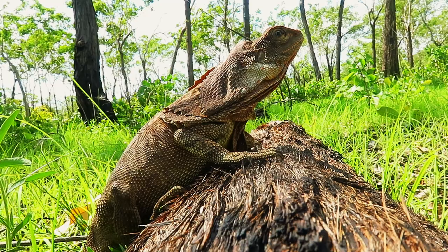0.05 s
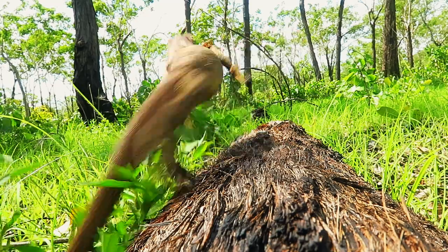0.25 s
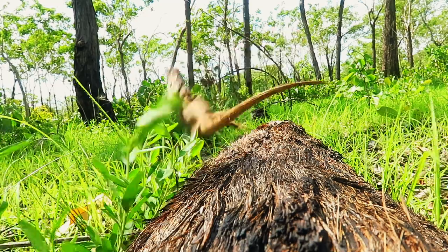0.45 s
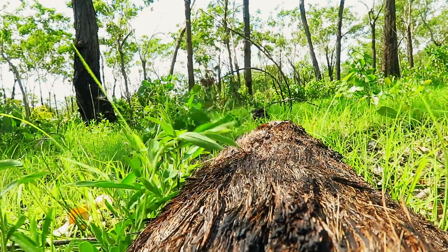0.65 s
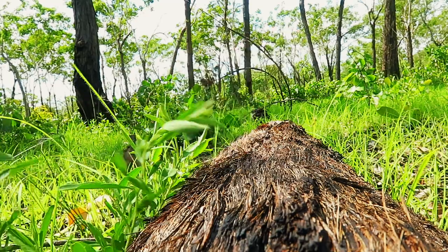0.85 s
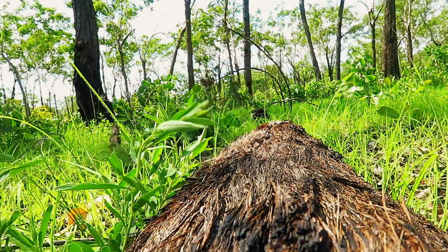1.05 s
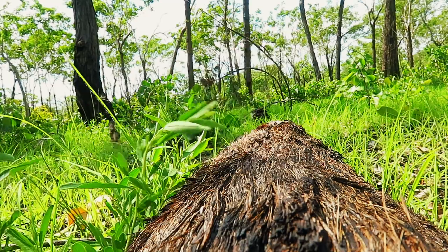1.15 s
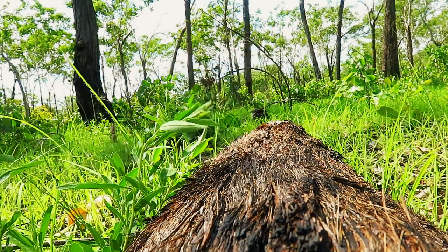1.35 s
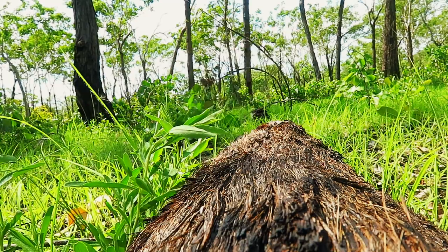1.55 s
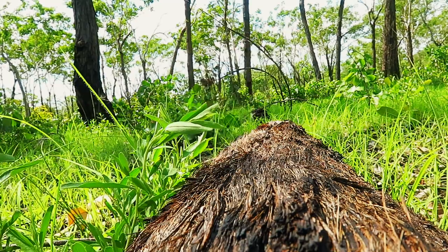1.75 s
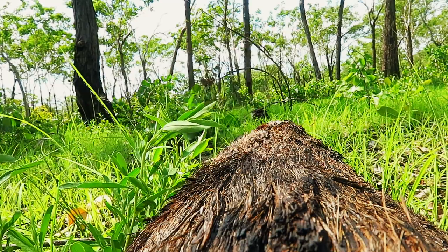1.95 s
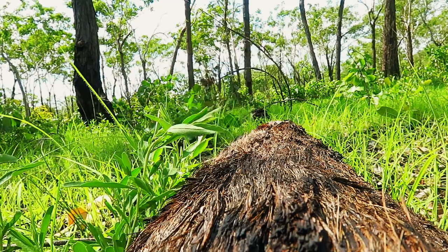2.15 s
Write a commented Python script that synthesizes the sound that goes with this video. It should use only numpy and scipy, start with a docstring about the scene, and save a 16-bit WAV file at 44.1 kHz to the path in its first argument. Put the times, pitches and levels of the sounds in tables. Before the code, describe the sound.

Dry grass and leaves crackle as a lizard dashes off in short, fading bursts.

```python
"""Lizard in dry grass

A lizard scrambles off a log, lands in dry grass and runs away in three dashes, in quiet woodland.
Blades brush its body as a fine crackle, dead leaves crunch, stalks snap and its feet thud softly.
Behind it lie a faint hiss of air and a low hum. Two closely spaced microphone ports listen."""
import sys
import numpy as np
from scipy import signal
from scipy.fft import rfft, irfft
from scipy.io import wavfile

SR = 44100
rng = np.random.default_rng(int(sys.argv[2]) if len(sys.argv) > 2 else 0)


def master(y):
    """Save y as 16-bit WAV."""
    cut = np.clip(np.atleast_2d(y).T, -1, 1)
    pcm = np.round(cut * 32767)  # scale
    wavfile.write(sys.argv[1], SR, pcm.astype(np.int16))


N = 97020  # 2.2 seconds
TIME_S, FREQS_HZ = np.arange(N) / SR, np.fft.rfftfreq(N, 1 / SR)


def amp(db):
    """Turns decibels into a multiplier."""
    return 10 ** (np.asarray(db) / 20)


def unit(x):
    """Scales a sound to an average (rms) level of 1."""
    return x / np.sqrt(np.mean(x ** 2) + 1e-20)


def read(points, hz):
    """Reads between a table's rows, on a log-frequency scale."""
    freqs, values = np.transpose(points)
    return np.interp(np.log(hz + 1), np.log(freqs + 1), values)


def add(mix, start_s, sound):
    """Mixes a sound in at its start time."""
    part = mix[max(round(start_s * SR), 0):][:len(sound)]
    part += sound[:len(part)]


def colour(x, tone, size=4096):
    """Shapes bass and treble to a tone table, with no ringing ahead of a click."""
    log_gain = np.log(amp(read(tone, abs(np.fft.fftfreq(size, 1 / SR)))))
    taps = np.fft.ifft(np.exp(np.conj(signal.hilbert(log_gain)))).real[:size // 2]
    return signal.fftconvolve(x, taps)[:len(x)]


def resonate(x, hz, width_hz):
    """Makes a sound ring around one pitch."""
    r = np.exp(-np.pi * width_hz / SR)
    return signal.lfilter([1 - r, 0, r - 1], [1, -2 * r * np.cos(2 * np.pi * hz / SR), r * r], x)


def clicks(n, per_s, spread_db):
    """Tiny random breaks, a few much louder than the rest."""
    size = amp(spread_db * np.minimum(rng.exponential(1, n), 4))
    return size * rng.choice([-1, 1], n) * (rng.random(n) < per_s / SR)


def drift(rate_hz):
    """A smooth random wobble."""
    return unit(irfft(rfft(rng.standard_normal(N)) * np.exp(-(FREQS_HZ / rate_hz) ** 2), N))


def ports(shared, apart, likeness):
    """Makes left and right: likeness 1 is the same, 0 unrelated, -1 opposite."""
    alike = np.clip(read(likeness, FREQS_HZ), -1, 1)
    mid = rfft(shared) * np.sqrt((1 + alike) / 2)
    side = rfft(apart) * np.sqrt((1 - alike) / 2)
    return irfft(np.array([mid + side, mid - side]), N)


# The air's tone: frequency_hz, level_db
AIR_TONE = [(12, -32), (25, -19), (70, -5), (180, -7.5), (320, -12.5), (800, -16), (1400, -21), (4400, -24),
            (6500, -26), (11500, -34), (13500, -47), (16000, -62)]
# How alike the air is left and right: frequency_hz, likeness
AIR_LIKENESS = [(60, .99), (130, 0.98), (400, 0.68), (1400, 0.26), (3100, 0.36), (15000, -0.61)]

def air():
    """Woodland air hisses faintly."""
    hiss = [unit(colour(rng.standard_normal(N), AIR_TONE)) for _ in range(2)]
    return amp(-51.5) * ports(*hiss, AIR_LIKENESS)


def hum(pitch_hz=57.6, waver=0.44):
    """A low note wavers, with a weaker one an octave up."""
    phase = 2 * np.pi * pitch_hz * TIME_S + waver * drift(5.6)
    low = np.sin(phase) * (1 + waver * drift(5.5))
    octave = amp(-5) * np.sin(2 * phase) * drift(6.8)
    return amp(-58.5) * unit(low + octave)


# How strongly each move brushes the grass: time_s, rustle_db, fizz_db
LEAP = [(0.16, -56, -93), (0.182, -50, -58), (0.214, -31, -48.5), (0.236, -39, -50.5), (0.266, -33, -44),
        (0.392, -41.5, -55), (0.442, -37, -46), (0.45, -47.5, -52.5), (0.52, -44.5, -58), (0.542, -55, -78),
        (0.56, -57, -60)]
FIRST_DASH = [(0.562, -42, -69), (.59, -37, -56), (0.619, -38.5, -53), (.645, -36.5, -45),
              (.695, -31.5, -38), (.725, -31.5, -41.5), (.765, -43, -53), (.79, -38.5, -43),
              (.835, -36.5, -47.5), (.865, -44.5, -49), (.9, -38.5, -41.5), (.945, -53.5, -63),
              (1.001, -42, -58), (1.034, -46, -55), (1.07, -42.5, -49), (1.135, -82, -61), (1.18, -53, -58),
              (1.24, -63, -62.5), (1.321, -62, -68)]
SECOND_DASH = [(1.38, -68, -62), (1.417, -43.5, -59), (1.445, -39, -49.5), (1.49, -34, -43.5),
               (1.529, -45.5, -53.5), (1.58, -48.5, -50), (1.62, -52.5, -56.5), (1.669, -51.5, -53.5),
               (1.71, -58.5, -72)]
THIRD_DASH = [(1.775, -54, -57), (1.799, -40.5, -51.5), (1.83, -34, -39), (1.865, -37.5, -44.5),
              (1.92, -40.5, -43), (1.98, -45.5, -54), (2.04, -48.5, -55), (2.1, -49.5, -53),
              (2.2, -60, -69)]
# The tone of the blades and of their tips: frequency_hz, level_db
RUSTLE_TONE = [(60, -39), (150, 5.5), (450, 1), (1000, -0.5), (1900, 0.5), (3000, -3), (4400, -1),
               (6000, -10.5), (8000, -20), (16000, 1)]
FIZZ_TONE = [(100, -52), (3500, -34), (7000, 5.5), (10500, 0), (13000, 1.5), (14500, 0.5), (16000, -39)]
# How alike the fizz is left and right: frequency_hz, likeness
FIZZ_LIKENESS = [(3000, .8), (7000, .5), (15000, 0.71)]

def grass_rustle(count=60, ticks_per_s=7000, spread_db=3.5, ring_s=0.00058):
    """Many blades tick against the body and ring briefly; their dry tips add fizz."""
    times, rustle_db, fizz_db = np.vstack([LEAP, FIRST_DASH, SECOND_DASH, THIRD_DASH]).T
    blades = np.zeros(N)
    for pitch_hz in np.linspace(500, 6500, count):
        ticks = clicks(N, ticks_per_s / count, spread_db)
        blades += unit(resonate(ticks, pitch_hz, 1 / (np.pi * ring_s)))
    plain_ticks = unit(clicks(N, ticks_per_s, spread_db))
    rustle = unit(colour(amp(4.5) * unit(blades) + plain_ticks, RUSTLE_TONE))
    rustle *= amp(np.interp(TIME_S, times, rustle_db, left=-np.inf) - 2.02)
    tips = [colour(clicks(N, per_s=4000, spread_db=5), FIZZ_TONE) for _ in range(2)]
    fizz = unit(ports(*tips, FIZZ_LIKENESS))
    fizz *= amp(np.interp(TIME_S, times, fizz_db, left=-np.inf) - 1.5)
    clumps = unit(amp(1.76 * drift(rate_hz=84)))  # blades catch and let go in clumps
    return clumps * (rustle + fizz)


# Leaves crushed or swept aside: start_s, length_s, level_db, pitch_hz, width_hz, ring_vs_crackle_db
LEAF_CRUNCHES = [(.197, 0.0039, -36, 1760, 800, 16), (0.263, 0.019, -40, 1800, 1370, 17),
                 (0.434, 0.007, -32.5, 2030, 1460, 7), (.526, 0.0029, -40.5, 3250, 1490, 15),
                 (0.566, 0.0033, -30, 2800, 900, -22), (0.575, 0.0095, -31, 1780, 1480, 4),
                 (0.635, 0.0092, -30, 3950, 900, -30), (0.675, 0.015, -32, 2230, 1180, 10),
                 (0.711, 0.011, -35.5, 3440, 900, -23), (0.729, 0.017, -37, 630, 350, 10),
                 (.748, 0.0031, -25.5, 1540, 1300, 14), (0.783, .007, -35, 2380, 1200, 0),
                 (0.894, 0.013, -33.5, 3540, 1200, -42), (.911, 0.0099, -42, 3700, 880, -24),
                 (0.967, 0.0048, -33.5, 3750, 915, -13), (1.051, .011, -26, 1150, 400, -14),
                 (1.155, 0.0085, -33.5, 4580, 1770, 2.5), (1.171, 0.0038, -34, 4770, 1500, -0.5),
                 (1.275, 0.0059, -43.5, 860, 600, -3.5), (1.386, 0.012, -34, 2400, 700, -11),
                 (1.423, 0.01, -29.5, 3750, 694, 24), (1.425, 0.0065, -37.5, 1000, 197, 17),
                 (1.426, 0.0083, -27, 2820, 400, 10), (1.445, .005, -35.5, 2780, 696, 3),
                 (1.5, .011, -39.5, 2040, 900, -6), (1.539, 0.0088, -43.5, 1490, 400, 2),
                 (1.563, 0.012, -37.5, 1260, 394, -6), (1.646, 0.011, -47.5, 1360, 615, -1.5),
                 (1.741, 0.0087, -50.5, 3420, 900, -27), (1.784, .012, -43.5, 1260, 910, 6),
                 (1.823, 0.0057, -31, 4370, 940, 4), (1.832, 0.012, -40.5, 1080, 700, 3),
                 (1.888, 0.0039, -33, 1120, 700, 1), (1.924, 0.017, -42.5, 463, 400, -1.5),
                 (1.973, 0.0056, -48, 1160, 600, -1)]
# The tone of a leaf's crackle: frequency_hz, level_db
CRACKLE_TONE = [(60, -38), (200, -18.5), (500, -9.5), (1200, -4.5), (2200, -1.5), (4500, 0.5), (6000, -8.5),
                (8500, -12.5), (13000, -22), (16000, -19)]

def leaf_crunches(rise_s=0.00043, fall_s=0.0038):
    """A leaf collapses in a burst of tiny breaks that make it ring."""
    out, t = np.zeros(N), TIME_S[:2048]
    for start_s, length_s, level_db, pitch_hz, width_hz, ring_db in LEAF_CRUNCHES:
        breaks = clicks(len(t), per_s=4200, spread_db=3)
        crackle = unit(colour(breaks, CRACKLE_TONE))
        ring = resonate(resonate(breaks, pitch_hz, width_hz), pitch_hz, 2 * width_hz)
        push = np.minimum(t / rise_s, 1) * np.exp(-np.maximum(t - length_s, 0) / fall_s)
        leaf = push * (crackle + amp(ring_db) * unit(ring))
        add(out, start_s, amp(level_db) * unit(leaf) * np.sqrt(np.mean(push ** 2)))
    return out


# Stalks and claws snapping: start_s, level_db, pitch_hz, fade_s, crack_vs_ring_db
STALK_SNAPS = [(0.2158, -25, 2120, 0.00052, -2), (0.266, -28, 1590, 0.00035, -8),
               (0.2889, -17, 4000, 0.00068, -4), (.3288, -20, 2230, 0.0006, -5),
               (0.4371, -19.5, 2530, 0.00037, -17), (.472, -24.5, 2400, .001, -11),
               (.4942, -28.5, 2960, .0008, -12), (.5, -31, 2600, 0.0014, -10),
               (0.51, -25.5, 3600, .0006, -6), (0.5169, -22.5, 2250, 0.00056, -27),
               (.5668, -6.5, 2980, 0.00062, -29), (.5693, -16, 3570, 0.00058, 0),
               (0.6306, -8, 4030, 0.00073, -11.5), (0.6377, -14.5, 1710, 0.0008, -14),
               (.654, -16, 2230, 0.001, -4), (.6636, -19, 11200, 0.00028, -19),
               (0.6868, -9, 3850, 0.00042, -2), (.7002, -14, 2900, 0.00035, -26),
               (.7476, -6.5, 2800, 0.00036, -29), (0.7488, -18.5, 1400, 0.001, -10),
               (0.7805, -20, 3800, .0005, -0.5), (.795, -20.5, 12700, 0.00056, 4),
               (.8496, -25, 7140, 0.00059, 0.5), (0.909, -26, 3870, 0.00023, -12),
               (0.9174, -17.5, 3820, 0.00071, -10), (0.9691, -20.5, 1740, .0006, -25),
               (.9833, -18.5, 2300, 0.00052, -21), (1.0476, -17.5, 3800, 0.00088, -7),
               (1.053, -22, 2480, 0.00019, 1), (1.083, -15, 4300, 0.00042, -28),
               (1.3868, -28, 3000, 0.00064, -6.5), (1.8271, -22.5, 4300, 0.0003, -7),
               (1.8794, -21.5, 1580, 0.0004, 5.5), (2.0993, -31, 5500, 0.00068, 1)]
# The tone of the crack: frequency_hz, level_db
CRACK_TONE = [(30, -45), (150, -15), (500, -6), (2000, 4.5), (4800, -3), (6200, -3), (9500, -12),
              (13000, -12), (16000, -31)]

def stalk_snaps(rise_s=0.00006, crack_s=0.00048, boost_db=1):
    """Each stalk breaks with a bright crack and rings for an instant."""
    out, t = np.zeros(N), TIME_S[:1024]
    for start_s, level_db, pitch_hz, fade_s, crack_db in STALK_SNAPS:
        ring = np.sin(2 * np.pi * pitch_hz * t) * np.exp(-t / fade_s) * (1 - np.exp(-t / rise_s))
        crack = colour(rng.standard_normal(len(t)) * np.exp(-t / crack_s), CRACK_TONE)
        snap = ring + amp(crack_db) * crack / abs(crack).max()
        add(out, start_s, amp(level_db + boost_db) * snap)
    return out


# Landings and footfalls: start_s, level_db, pitch_hz, fade_s
THUDS = [(0.439, -37.5, 140, 0.011), (0.454, -43.5, 50, 0.038), (.567, -42.5, 139, 0.013),
         (.635, -40, 190, 0.012), (.68, -37, 263, 0.0095), (0.743, -37, 176, 0.015),
         (.872, -36.5, 264, 0.015), (.895, -41, 142, 0.0097), (1.057, -35.5, 300, 0.0054),
         (1.834, -37, 270, 0.016)]

def thuds(rise_s=0.0012):
    """Feet and body hit log and ground with soft, dull bumps."""
    out, t = np.zeros(N), TIME_S[:8192]
    for start_s, level_db, pitch_hz, fade_s in THUDS:
        push = np.minimum(t / rise_s, 1) * np.exp(-t / fade_s)
        bump = push * rng.standard_normal(len(t))
        for _ in range(2):
            bump = resonate(bump, pitch_hz, width_hz=1.5 * pitch_hz)
        add(out, start_s, amp(level_db) * unit(bump) * np.sqrt(np.mean(push ** 2)))
    return out


# The treble cut on the later dashes: frequency_hz, gain_db
LATE_TREBLE = [(20, -0.5), (7000, 0), (11500, -1), (13000, -8.5), (16000, -18)]

def soften_treble(bright, start_s=0.82, end_s=1.3):
    """The highest treble fades, so the later dashes sound duller."""
    blend = np.clip((TIME_S - start_s) / (end_s - start_s), 0, 1)
    dull = irfft(rfft(bright) * amp(read(LATE_TREBLE, FREQS_HZ)), N)
    return (1 - blend) * bright + blend * dull


def echo_cloud(x, fade_s):
    """Many tiny echoes blur together and die away."""
    t = TIME_S[:16384]
    tail = rng.standard_normal(len(t)) * np.exp(-t / fade_s) * (1 - np.exp(-2 * t / fade_s))
    return signal.fftconvolve(x, tail / np.linalg.norm(tail))[:N]


# How alike the echoes are left and right: frequency_hz, likeness
ECHO_LIKENESS = [(60, 1), (600, 0.9), (1400, 1), (3100, 1), (6800, -0.37), (15000, 1)]

def echoes(pair):
    """Sound bounces off the nearby ground and lingers among the trunks."""
    mono, clouds = pair.mean(0), []
    for _ in range(2):
        ground = amp(-9.5) * echo_cloud(mono, fade_s=0.0034)
        trunks = amp(-14.5) * echo_cloud(mono, fade_s=0.066)
        clouds.append(ground + trunks)
    return ports(*clouds, ECHO_LIKENESS)


def from_left(pair, lead_s=0.00002):
    """The left port hears the sound slightly earlier and louder."""
    lead = np.exp(1j * np.pi * FREQS_HZ * lead_s) * amp(0.5)
    return irfft(rfft(pair) * np.array([lead, 1 / lead]), N)


def scene():
    """The lizard flees, a little to the left, over the air and the hum."""
    lizard = soften_treble(stalk_snaps() + leaf_crunches() + thuds() + grass_rustle())
    return from_left(lizard + echoes(lizard)) + air() + hum()


def record(dry, cutoff_hz=15900):
    """Cuts off the very highest treble."""
    taps = signal.firwin(511, cutoff_hz, window=("kaiser", 9), fs=SR)
    return signal.oaconvolve(dry, taps[None], "same")


dry = scene()
out = record(dry)
master(out)
```